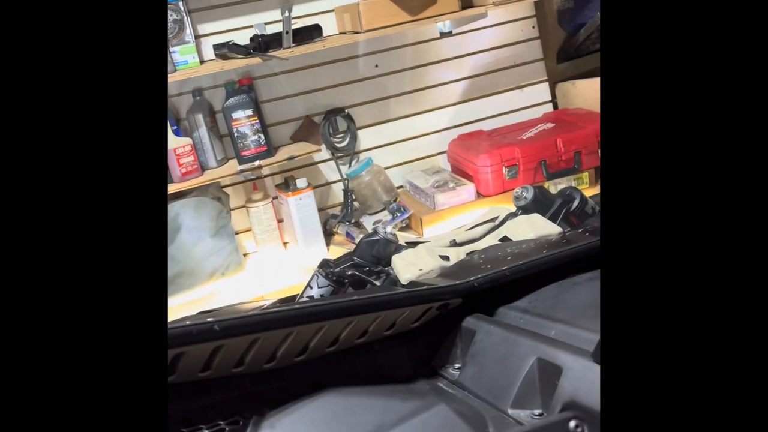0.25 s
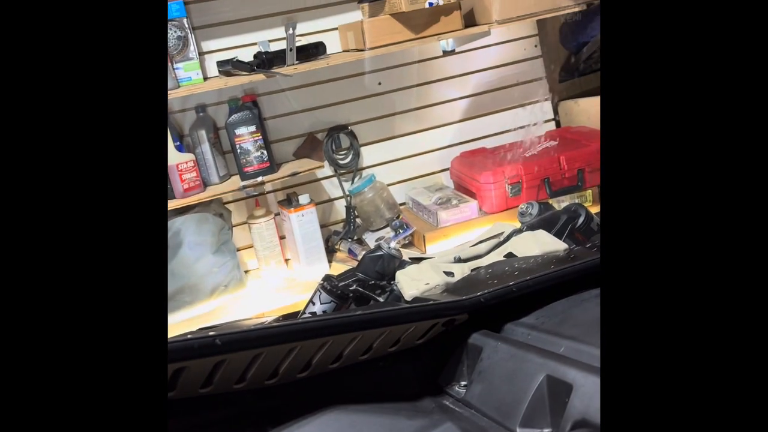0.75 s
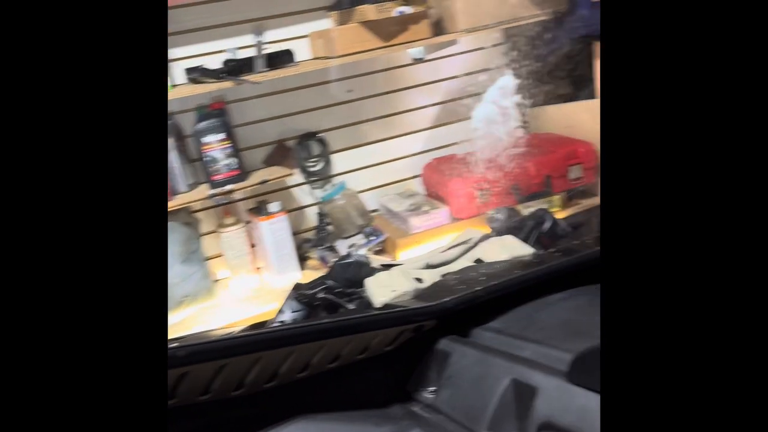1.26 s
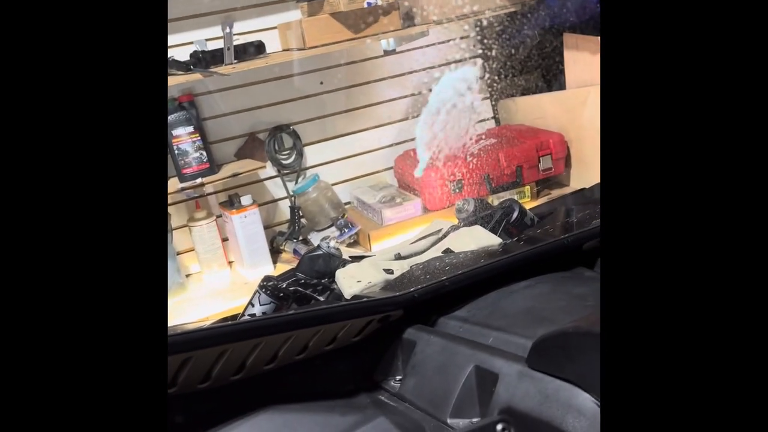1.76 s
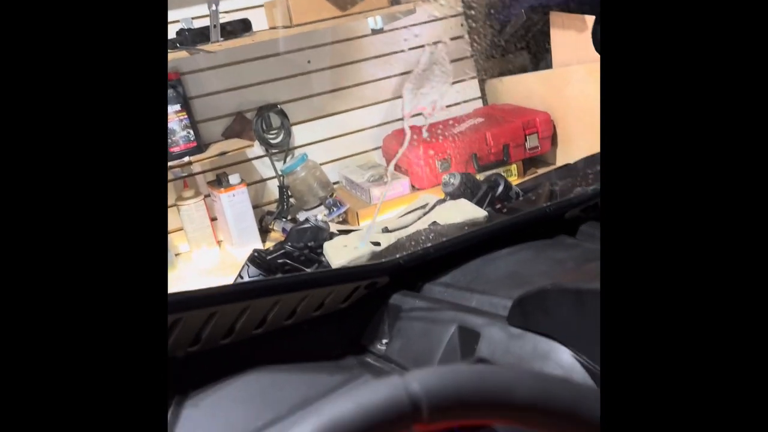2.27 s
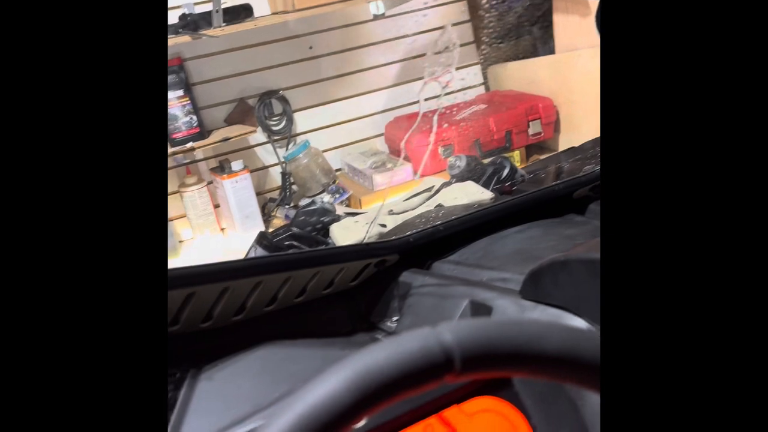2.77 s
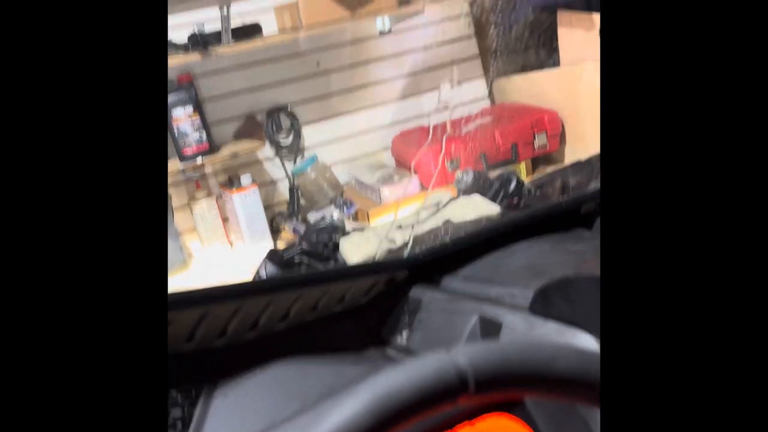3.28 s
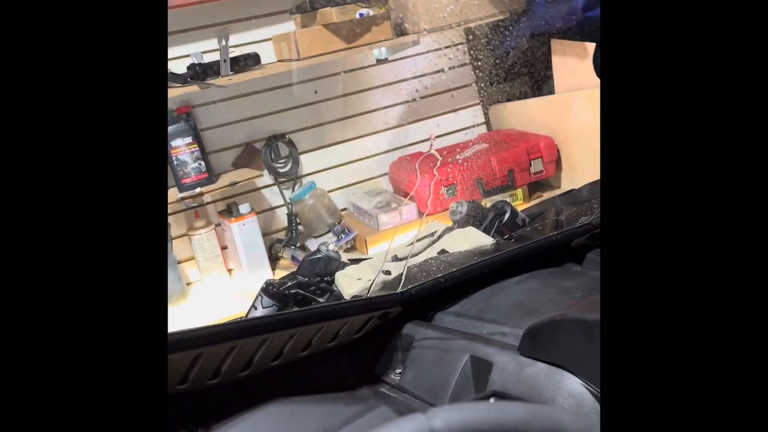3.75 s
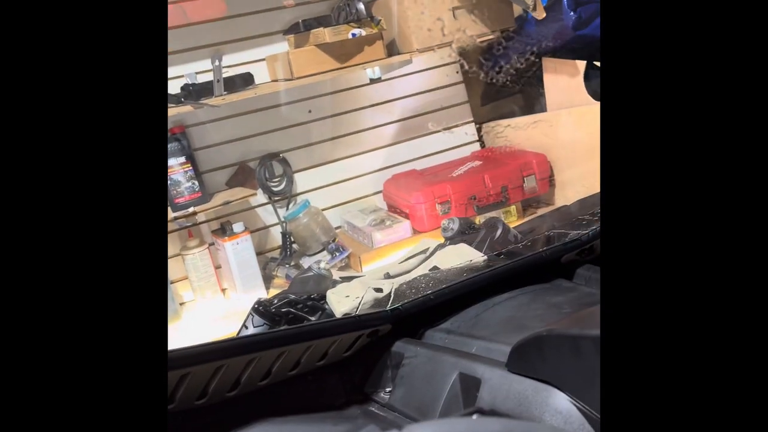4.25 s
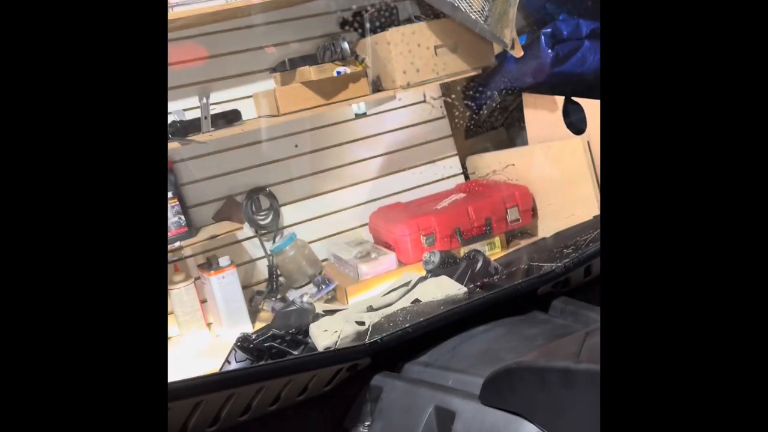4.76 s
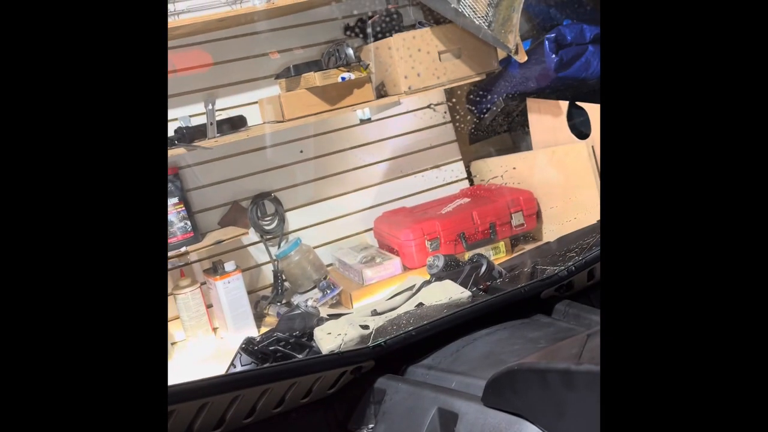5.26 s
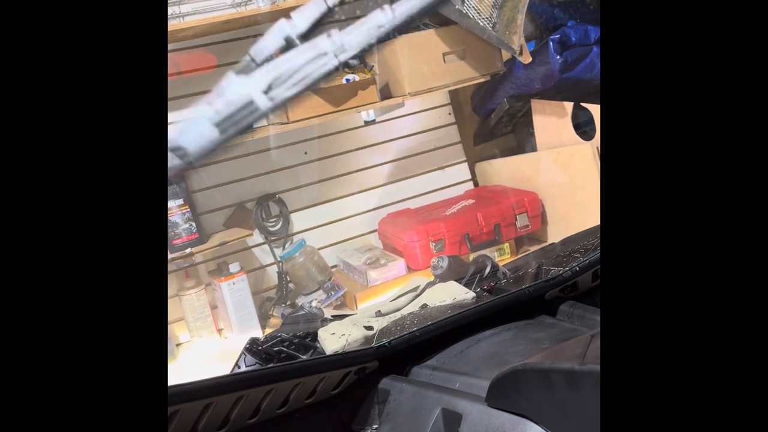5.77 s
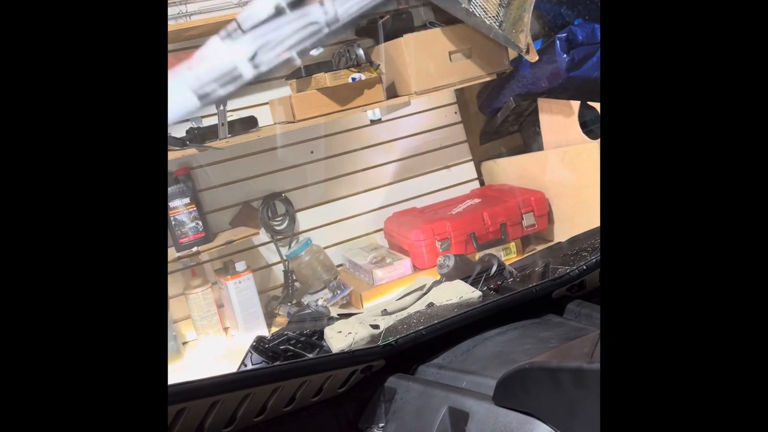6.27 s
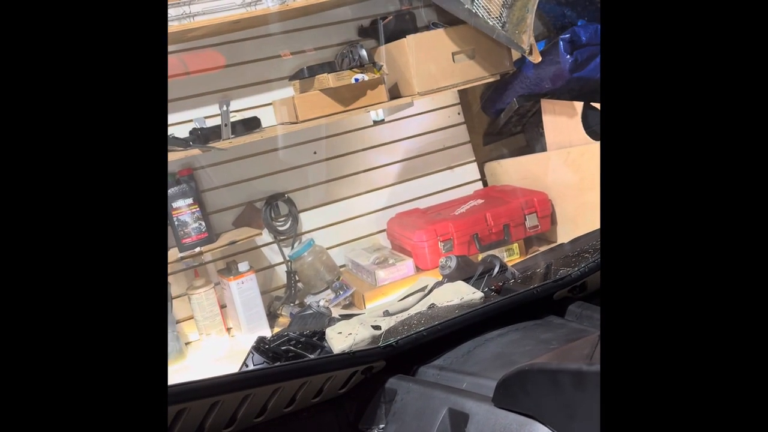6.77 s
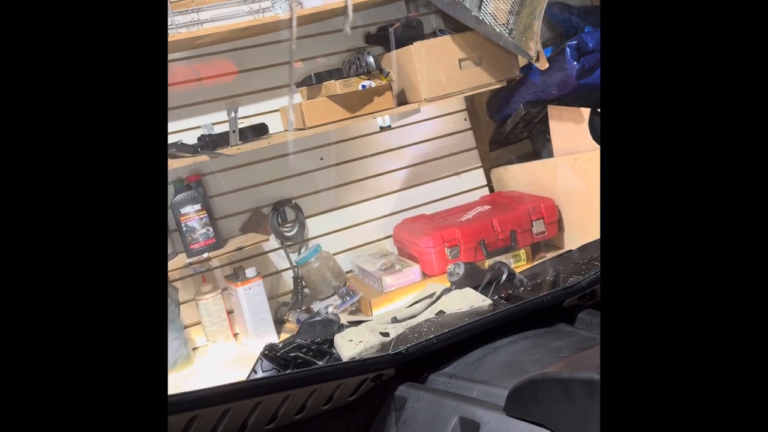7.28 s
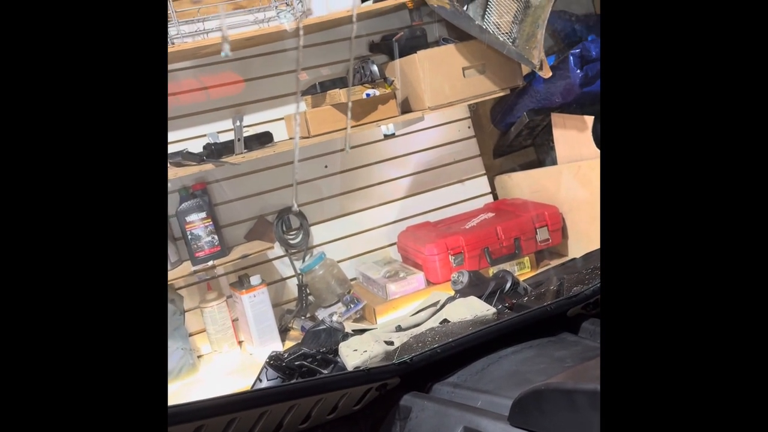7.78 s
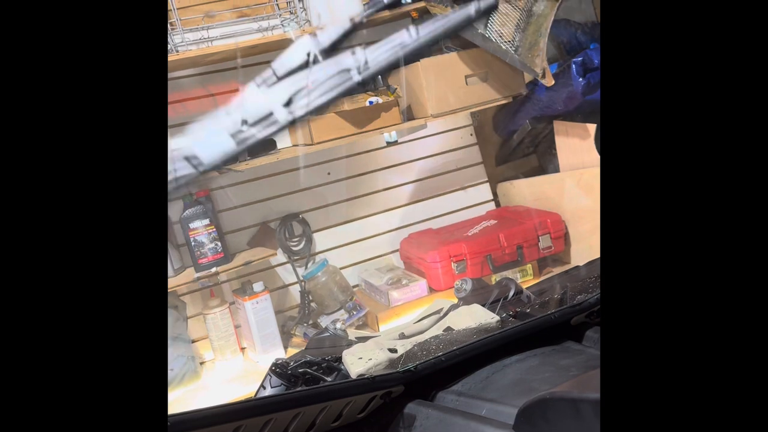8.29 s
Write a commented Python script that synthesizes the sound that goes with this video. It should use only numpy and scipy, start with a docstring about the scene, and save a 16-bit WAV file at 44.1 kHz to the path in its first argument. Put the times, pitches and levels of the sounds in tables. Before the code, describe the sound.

A switch clicks, a small washer pump buzzes and hisses water, then after a pause a wiper motor whines while its blade judders and knocks.

```python
"""Inside a utility vehicle's cab in a garage, a faint rumble and soft bumps are heard, then a switch snaps.
The washer pump hums in harmonics of its speed, and filtered noise sprays the windscreen.
Then the wiper motor whines in orders of its shaft, slowing under load in each sweep;
the rubber blade judders and groans by stick and slip, and the linkage knocks where it turns round."""
import sys
import numpy as np
from scipy import signal
from scipy.fft import rfft, irfft, next_fast_len
from scipy.io import wavfile
from scipy.ndimage import uniform_filter1d, map_coordinates

SR = 44100
rng = np.random.default_rng(int(sys.argv[2]) if len(sys.argv) > 2 else 0)


def master_out(mix):
    """Clip the mix to full scale and print it as 16-bit PCM to the path in sys.argv[1]."""
    frames = np.transpose(np.atleast_2d(mix))
    ceiling = np.clip(frames, -1, 1)
    pcm = np.round(ceiling * 32767).astype(np.int16)
    wavfile.write(sys.argv[1], SR, pcm)


N = 376173  # samples

# Times named _S and t60 are in seconds; an attack is a time constant, a t60 the time to fall 60 dB.

# Load on the motor over one crank turn. Each row: time into the turn in s, armature slots passing per second.
LOAD_CYCLE = [(0, 543), (.2, 531), (.38, 513), (.55, 490), (.66, 468), (.76, 461), (.93, 480), (1.08, 478),
              (1.2, 524), (1.29, 528), (1.43, 516), (1.56, 476), (1.64, 461), (1.78, 451), (1.95, 443),
              (2.12, 459), (2.3, 497), (2.44, 540)]
# Speed gained where the glass is more slippery. Each row: time in s, gain in Hz.
SLIPPERY_GLASS = [(3.6, -1), (5.7, 0), (6.1, 0.5), (6.19, 10), (6.55, 12), (6.7, 0.5), (6.9, -2.5),
                  (7.15, 6.5), (7.5, 9.5), (7.9, 3), (8.15, 5.5), (8.33, 12.5), (8.5, 1.5)]
# Jolts of the arm that brake the motor. Each row: time in s, dip in Hz, delay of the first rebound in s.
ARM_JOLTS = [(3.745, 22, 0.075), (5.04, 48, 0.138), (6.23, 28, .155), (7.52, 48, .136), (8.41, 24, 0.13)]
MOTOR_START_S, RUN_UP_S = 3.585, .013  # start, and time constant of the run-up
TURN_START_S, TURN_S = 3.7, 2.48  # one turn of the crank takes the blade out and back
JOLT_WIDTH_S, REBOUND_SHRINK, REBOUND_KEEPS = .028, .63, .58  # each rebound's delay and depth shrink so
MID_SPEED_HZ = 480  # reference slot rate

# Standing waves of the cab at the slot tone and its octave. Each row: frequency in Hz, level in dB.
SLOT_TONE_RESPONSE = [(442, -50.5), (452, -52.5), (461, -44.5), (472, -42), (484, -40.5), (499, -47),
                      (510, -45.5), (530, -41), (548, -49)]
SLOT_OCTAVE_RESPONSE = [(885, -47), (925, -42.5), (945, -44), (965, -52), (990, -40), (1030, -46),
                        (1055, -40.5), (1095, -51)]
# Housing resonances that the overtones cross. Each row: frequency in Hz, level in dB.
THIRD = [(1330, -48), (1368, -56), (1395, -51.5), (1470, -54), (1570, -58.5)]
FOURTH = [(1780, -76), (1900, -62), (1980, -54.5), (2020, -44), (2060, -50), (2110, -54), (2190, -53)]
FIFTH = [(2225, -50.5), (2275, -58.5), (2315, -48), (2375, -52), (2430, -57), (2475, -49), (2515, -50.5),
         (2580, -63), (2630, -67.5), (2675, -48.5), (2740, -62)]
WORM = [(2500, -70), (2590, -67), (2640, -61.5), (2672, -40.5), (2710, -64), (2760, -75), (3000, -79)]
SEVENTH = [(3110, -78), (3160, -60), (3330, -57.5), (3395, -52.5), (3500, -54.5), (3600, -50.5),
           (3700, -54.5), (3780, -56.5)]
EIGHTH = [(3550, -68), (3750, -67.5), (3830, -61), (4000, -65.5), (4120, -56.5), (4200, -62.5),
          (4280, -58.5)]
# Motor overtones. Each row: order of the shaft, response table, extra dB in the first sweep.
MOTOR_OVERTONES = [(36, THIRD, 0), (48, FOURTH, 0), (60, FIFTH, 5), (66, WORM, 0), (84, SEVENTH, 2),
                   (96, EIGHTH, 10)]
FIRST_SWEEP_S, FIRST_SWEEP_WIDTH_S = 4.06, 0.27
# Faint armature and gear whine. Each row: order of the shaft, level in dB before the housing's gain.
WHINE_ORDERS = [(11, -63), (13, -61), (16, -64), (18, -60), (19, -61), (20, -60), (22, -62), (23, -57.5),
                (25, -57.5), (26, -62), (28, -60), (29, -63), (30, -61), (32, -63), (34, -62), (35, -65),
                (37, -66), (47, -64), (49, -62), (52, -62), (53, -61), (58, -62), (62, -63), (63, -61),
                (64, -61), (65, -58), (72, -67), (74, -68), (75, -68), (95, -66), (100, -67), (102, -69),
                (106, -63), (108, -63), (119, -66), (126, -67), (132, -63), (142, -62), (144, -62),
                (154, -63), (156, -65), (167, -62), (168, -60), (170, -61)]
# Resonances of the motor housing. Each row: centre in Hz, width in Hz, gain in dB.
HOUSING_MODES = [(2950, 50, -4.5), (4000, 82, 11.5), (6400, 160, 7.5), (6850, 120, -4.5)]
# Spectra of the gear and brush scraping. Each row: frequency in Hz, level in dB.
GEAR_COLOUR = [(100, -26.5), (300, 1), (600, -1.5), (800, 2.5), (1120, 1), (1600, -11.5), (1900, -8),
               (2050, 7.5), (2350, -2), (2600, -2), (2900, -6)]
BRUSH_COLOUR = [(1500, -15.5), (2900, -6.5), (3400, -10.5), (4100, -6.5), (4700, -9.5), (5500, -4.5),
                (6100, -1.5), (6700, 2.5), (7500, -2), (8700, -14), (9500, -2), (11400, -56.5),
                (12200, -13), (13400, -18.5), (15500, -13.5)]
TONE_BUILD_S = 0.31  # time constant of the slot tones' build-up
WHINE_DB, WHINE_DB_PER_HZ = -0.5, 0.0051  # whine gain at mid speed, and its growth with slot rate
BRUSH_DB, BRUSH_DB_PER_HZ = -41, 0.0264  # brush hiss at mid speed, and its growth with slot rate

# The gear housing sings late in each sweep. Each row: time in s, level in dB.
SINGING = [(4.7, -47.5), (5.97, -50), (7.2, -49.5), (8.47, -48)]
# Resonance of the singing housing, applied twice. Each row: centre in Hz, width in Hz, gain in dB.
SINGING_MODE = [(2676, 440, 0)]
SING_WIDTH_S, SING_ORDER = 0.31, 64  # bell width; multiple of the shaft's speed
SING_SPREAD_HZ = 170  # width of the grain's resonance before it is cubed

# The linkage takes up its slack. Each row: time in s, level in dB.
CLUNKS = [(5.04, -31.5), (6.174, -45.5), (7.222, -45.5), (7.519, -31.5)]
# Modes of the windscreen and its frame. Each row: frequency in Hz, mean level in dB, t60 in s.
LINKAGE_MODES = [(42.3, -22.5, 0.37), (85, -10.5, 0.43), (180.6, -3.5, 0.19), (216, -4, 0.19),
                 (334, -2, 0.18), (816, -20, 0.04)]

# Judder of the whole blade. Each row: start in s, length in s, glass level in dB, rasp level in dB.
JUDDERS = [(3.682, 0.014, -26, -36.5), (3.698, .055, -22, -33.5), (3.765, 0.045, -26.5, -31.5),
           (3.81, 0.026, -30.5, -38.5), (3.845, 0.058, -36.5, -39.5), (3.915, 0.025, -30, -45),
           (4.005, 0.056, -41.5, -43), (4.095, .035, -36.5, -49), (6.168, 0.041, -27, -36),
           (6.222, 0.023, -29, -41), (6.252, 0.055, -30.5, -34.5), (6.318, 0.017, -42, -41),
           (6.395, .035, -39, -42), (6.598, 0.029, -34.5, -44), (6.64, 0.13, -43.5, -60)]
# Pace of the judder. Each row: time in s, hops per second.
JUDDER_RATE = [(3.69, 88), (3.75, 98.5), (3.8, 84), (3.86, 82), (3.93, 80), (4.1, 89), (6.17, 80),
               (6.23, 83), (6.3, 79), (6.4, 82)]
# Spectra of the shaken glass and the rubber's rasp. Each row: frequency in Hz, level in dB.
GLASS_COLOUR = [(60, -21.5), (90, -11), (125, 5), (160, 2.5), (185, 13), (215, -1.5), (247, 4.5),
                (278, -1.5), (330, 5), (380, -2), (470, -10), (650, -21), (1200, -47)]
RASP_COLOUR = [(250, -20.5), (480, 4.5), (720, 3.5), (900, -1.5), (1070, -1.5), (1300, -10.5), (1900, -9),
               (2600, -18), (4000, -28.5), (8000, -59), (12000, -87)]
# Groans of the lip. Each row: start in s, length in s, tone level in dB, rasp level in dB, roughness from 0 to 1.
GROANS = [(3.845, 0.024, -30.5, -48, .3), (3.9, 0.059, -31.5, -53, 0.21), (4.002, 0.07, -38, -54.5, 0.23),
          (4.1, 0.049, -44, -48, .3), (6.255, 0.048, -30, -39, .35), (6.311, 0.076, -29.5, -43, .2),
          (6.4, 0.022, -23, -34.5, 0.44), (6.443, 0.025, -24.5, -30.5, .2), (6.482, .03, -33, -36, .3),
          (6.516, 0.044, -22.5, -29, 0.09), (6.57, 0.029, -34.5, -35, .3), (6.607, 0.013, -26.5, -42, .2)]
# Pitch of the groaning lip. Each row: time in s, slips per second.
SLIP_RATE = [(3.85, 324), (3.92, 350), (3.96, 325), (4.01, 320), (4.06, 295), (4.14, 314), (6.25, 238),
             (6.31, 272), (6.35, 322), (6.39, 335), (6.415, 382), (6.455, 352), (6.485, 390), (6.52, 358),
             (6.57, 355), (6.595, 307), (6.62, 373)]
# Spectrum of the lip's rasp. Each row: frequency in Hz, level in dB.
LIP_COLOUR = [(350, -12), (520, 0.5), (720, 0.5), (1070, -0.5), (1400, -4.5), (1800, -8), (2150, -10),
              (2600, -12.5), (4000, -24.5), (8000, -54.5)]
JUDDER_JITTER, JUDDER_GRIT = .05, .5  # scatter of the hop rate; scraping noise relative to the hops
GRAB_ATTACK_S, GRAB_T60_S = 0.0048, 0.12

# The blade flops over at the ends of its sweep. Each row: time in s, level in dB.
FLIPS = [(5.034, -33), (6.179, -25), (7.511, -39)]
# Spectrum of the clack. Each row: frequency in Hz, level in dB.
FLIP_COLOUR = [(150, -14.5), (400, 6), (950, 7), (1400, -8.5), (2100, -2), (2700, -16), (3500, -29),
               (8000, -52)]

# Pump speed: it runs up, labours while it swallows air, then settles. Each row: time in s, speed in Hz.
PUMP_SPEED = [(.577, 200), (.6, 245), (.63, 272), (.655, 300), (.715, 307), (.755, 315), (.8, 318.7),
              (.9, 320), (1.1, 321.1), (1.4, 321.9)]
# Pump harmonics, relative to the pump's level. Each row: multiple of the pitch, dB while it draws air,
# dB once primed, drift in dB per second.
PUMP_ORDERS = [(1, -7, -1.5, -7), (2, -14, -4.3, -.5), (3, -22, -21, 3.5), (4, -14, -9.5, -.5),
               (5, -5, -.7, 2), (6, -24, -18.5, 4), (7, -19, -31, 0), (8, -28, -30, 0), (9, -35, -19, -3),
               (10, -35, -24, -3), (11, -32, -33, 14), (12, -31, -32, 8), (13, -26, -33, 3),
               (14, -33, -26, 0), (16, -30, -23, -5), (17, -35, -29, 2), (18, -28, -25, -8),
               (19, -36, -37, 15), (20, -30, -24, -3), (21, -34, -26, -3), (22, -26, -18, -5),
               (23, -19, -17, 7), (25, -28, -21, 5), (28, -26, -17, -12), (29, -21, -12, -1),
               (30, -23, -14, 2)]
# Partials that swell and fade as the pressure builds. Each row: multiple, time in s, width in s, dB.
PUMP_FLARES = [(7, .685, .04, -12), (6, .755, .035, -12), (8, .755, .04, -13), (11, .8, .1, -18),
               (12, .83, .09, -16), (13, .92, .09, -14), (10, .96, .13, -19), (18, 1.1, .18, -17),
               (20, 1.1, .17, -9.5), (29, 1.15, .2, -12), (8, 1.15, .13, -20), (8, 1.47, .28, -15.5)]
# Resonances of the pump body, applied twice. Each row: centre in Hz, width in Hz, gain in dB.
PUMP_BODY = [(1230, 87, -3), (1550, 95, -12), (1900, 100, 2), (2170, 90, 0), (2510, 84, 0), (3550, 130, -4),
             (3850, 146, -7)]
# Water hissing as it surges, flows and drains. Each row: start in s, length in s, level in dB, t60 in s.
SPRAY = [(.58, 0.033, -47, 0.65), (0.62, 1.04, -51, 0.24), (1.675, 0.13, -50, 0.24)]
# Spectrum of the spray. Each row: frequency in Hz, level in dB.
SPRAY_COLOUR = [(60, -4), (200, -2.5), (700, -2), (1400, -0.5), (2700, -1), (4200, -3), (4800, -9),
                (7000, -2), (8000, -3.5), (15500, -23)]
# Spectra of the pump's vanes and of the spitting nozzle. Each row: frequency in Hz, level in dB.
VANE_COLOUR = [(1000, -33.5), (9000, -5), (11500, -31.5), (13500, 4), (15500, -1.5)]
SPIT_COLOUR = [(3000, -10.5), (6000, -3.5), (8500, -1.5), (12000, -15.0)]
PUMP_ON_S, PUMP_OFF_S = .577, 1.668  # the switch is pressed and let go
PUMP_DB = -42.5  # at full speed
FIRST_BITE_S = 0.648  # the vanes bite and the overtones set in
PRIME_S, PRIME_TAKES_S, AIR_FLUTTER_DB = 0.744, 0.081, 3  # water arrives; before that the hum flutters
PRIMED_S = .85  # the drift counts from here
COAST_S, COAST_DB_PER_S = .3, 58  # rotor's slowing; each order loses this many dB more per second
RATTLE_DB, RATTLE_HOLD_S, RATTLE_T60_S = -50, 0.073, 0.28  # the body rattles while it fills
SPIT_S, SPIT_LENGTH_S, SPIT_DB = 1.975, 0.043, -51.5  # the nozzle spits as the hose empties

# Snaps of switches, relay and wiper arm. Each row: time in s, crack in dB, crack t60 in s, knock in dB, ping in dB.
SNAPS = [(0.579, -30, 0.074, -54.5, -31), (1.670, -25, 0.038, -55, -30), (1.673, -35, 0.14, -41, -44),
         (2.786, -55, 0.83, -78, -55), (3.565, -64, 0.095, -51, -51.5), (3.582, -20, 0.034, -40, -47),
         (3.584, -15, 0.011, -25, -55.5), (3.592, -42, 0.08, -36, -49), (8.364, -12.5, 0.029, -25, -22),
         (8.37, -28.5, 0.061, -36, -42)]
# Spectra of the crack and of the knock. Each row: frequency in Hz, level in dB.
CRACK_COLOUR = [(300, -30), (1000, -16.5), (1900, 1), (2600, -15), (3500, 1.5), (5300, 0), (6000, 5),
                (8000, 3.5), (9800, 7.5), (11500, -12), (14500, -6.5), (15500, -3)]
KNOCK_COLOUR = [(60, -11), (180, 5), (350, 5), (700, 0.5), (1300, 0), (2000, -17), (5000, -6.5),
                (11000, -75)]
# Spectrum of the metal ping. Each row: frequency in Hz, level in dB.
PING_COLOUR = [(2000, -56.0), (2550, 2.0), (2750, -4.5), (3100, -8.5), (4500, -27.5)]

# Bumps of cab and linkage. Each row: time in s, thud in dB, knock in dB, t60 of both in s, panel sway in dB.
BUMPS = [(0.014, -63.5, -65, 1, -53), (0.391, -49.5, -66, 0.32, -71), (.525, -46.5, -68, 0.2, -63),
         (.59, -43.5, -47, 0.34, -63.5), (1.703, -47.5, -45, 0.71, -70), (2.095, -36.5, -80, 0.2, -48.5),
         (2.17, -61, -92, 0.2, -51), (2.786, -36, -51.5, 0.3, -46.5), (2.91, -68, -61.5, 0.32, -62),
         (4.65, -48, -55, 0.23, -44.5), (4.951, -42.5, -50, 0.25, -43), (5.037, -28.5, -37.5, 0.13, -38),
         (5.114, -40.5, -47, 0.16, -53), (6.177, -20, -47, 0.13, -59), (6.6, -35, -57, 0.36, -63),
         (7.11, -48.5, -43.5, 0.31, -41), (7.219, -47, -38, 0.12, -55), (7.4, -45, -49, 0.41, -43.5),
         (7.519, -33.5, -39.5, 0.23, -47.5), (8.45, -37.5, -62, 0.23, -47)]
# Spectra of the thud and of the panel sway. Each row: frequency in Hz, level in dB.
THUD_COLOUR = [(25, -29), (55, -3.5), (85, 7.5), (125, -7), (190, 1), (300, -19.5), (600, -43), (3000, -94)]
SWAY_COLOUR = [(15, -37), (30, -25.5), (43, -4.5), (62, 0), (100, -27.5), (300, -52.5)]
SWAY_ATTACK_S, SWAY_T60_S = 0.028, 0.73  # the panels swing on after each bump

WHISTLE_S, WHISTLE_RISE_S, WHISTLE_DB = 2.43, 0.42, -69.5

# Spectra of the cab's drone and of the garage hiss. Each row: frequency in Hz, level in dB.
DRONE_COLOUR = [(35, -34), (70, -5), (94, 6.5), (120, -12), (180, -9), (280, -15), (500, -26),
                (1500, -46.5)]
GARAGE_COLOUR = [(60, -9), (300, -2.5), (550, -5.5), (1500, -3), (2300, 9), (3400, -4), (5000, 3),
                 (5700, 0), (7300, -0.5), (8600, -7.5), (12000, -18.5), (14000, -12.5), (15000, 16),
                 (15700, 1)]
# Faint thin tones of steady pitch. Each row: frequency in Hz, level in dB.
THIN_TONES = [(2000, -78), (6000, -77.5), (10000, -73.5)]
REST_SWAY_DB, REST_DRONE_DB = -74, -59  # the cab at rest
RUN_SWAY_DB, RUN_DRONE_DB, SHAKE_DB_PER_HZ = -58.5, -51, 0.0865  # motor's share at mid speed; growth with speed

# Sideways reflections in the cab. Each row: frequency in Hz, share of the power scattered.
SCATTERED_SHARE = [(80, .001), (140, .005), (300, .02), (550, .18), (1000, .11), (1700, .13), (2400, .3),
                   (3000, .33), (5000, .33), (5900, .11), (8500, .11), (10500, .003), (13200, .003),
                   (15500, .2)]
# Standing waves that favour one side. Each row: frequency in Hz, left minus right in dB.
STANDING_BALANCE = [(320, -3.7), (440, -2), (456, -4), (480, 0), (500, -1), (540, 5), (640, -1.5),
                    (885, 10), (905, 10), (925, 2), (965, -2.5), (1005, 2), (1060, -3), (1090, -7),
                    (1285, -1), (1610, 1), (2500, 0)]
# Level difference of the microphone ports. Each row: frequency in Hz, left minus right in dB.
PORT_BALANCE = [(100, 0), (330, .7), (550, 3), (950, 2.5), (1600, .5), (2500, 0), (4000, .5), (7000, 0)]
# Phase difference of the microphone ports. Each row: frequency in Hz, radians by which the left leads.
PORT_PHASE = [(250, 0), (550, .55), (1000, .3), (1450, -.35), (2000, 0), (5000, -.2), (6500, -1),
              (8000, -1.7), (10500, -3.1), (13200, -3.2), (15500, -4.3)]
TOP_HZ = 15800  # band limit


def amp(db):
    """Level: decibels to amplitude gain."""
    return 10 ** (np.asarray(db) / 20)


def unit(x):
    """Normalisation to rms 1."""
    return x / np.sqrt(np.mean(x ** 2) + 1e-20)


def levelled(x, size=1500):
    """Normalisation to a running rms of 1, over size samples."""
    return x / np.sqrt(np.abs(uniform_filter1d(x * x, size)) + 1e-9)


def along(points, hz):
    """Interpolation of (Hz, value) points on a logarithmic frequency axis."""
    f, v = np.transpose(points)
    return np.interp(np.log(hz + 1), np.log(f + 1), v)


def curves(rows):
    """Interpolation in time: one value per sample for each column after the time."""
    s, *columns = np.transpose(rows)
    return [np.interp(np.arange(N) / SR, s, column) for column in columns]


def wobble(rate):
    """Random modulation: a smooth curve through rate random knots per second."""
    knots = rng.standard_normal(int(N * rate / SR) + 4)
    fine = np.arange(0, N * rate / SR + 1, 1 / 8)  # spline read at eighths of a knot
    return np.interp(np.arange(N) * (rate / SR), fine, map_coordinates(knots, [fine]))


def since(s):
    """Seconds gone by since time s, zero before it."""
    return np.maximum(np.arange(N) / SR - s, 0)


def held(s, length, attack, t60):
    """Exponential attack at time s, hold, and exponential release after length."""
    release_db = -60 * np.minimum(since(s + length) / t60, 2)
    return (1 - np.exp(-since(s) / attack)) * amp(release_db)


def burst(s, t60, attack):
    """Exponential decay of a blow at time s."""
    return held(s, 0, attack, t60)


def swell(s, width):
    """Gaussian rise and fall around time s."""
    return np.exp(-np.minimum(((np.arange(N) / SR - s) / width) ** 2, 20))


def filtered(x, response):
    """Linear filtering: x times a complex response of frequency."""
    m = next_fast_len(N + SR // 2)
    return irfft(rfft(x, m) * response(np.fft.rfftfreq(m, 1 / SR)), m)[..., :N]


def coloured(x, spectrum):
    """Spectral shaping by (Hz, dB) points, at rms 1."""
    return unit(filtered(x, lambda hz: amp(along(spectrum, hz))))


def noise(spectrum):
    """Coloured Gaussian noise of rms 1."""
    return coloured(rng.standard_normal(N), spectrum)


def resonance(modes, hz):
    """Resonance: gain at hz of (Hz, width, dB) modes whose powers add."""
    power = sum(amp(db) ** 2 / (1 + (2 * (hz - centre) / width) ** 2) for centre, width, db in modes)
    return np.sqrt(power)


def partial(turns, order):
    """Harmonic of rotation: a sine of rms 1 at a multiple of a shaft's speed."""
    return np.sqrt(2) * np.sin(2 * np.pi * (order * turns + rng.random()))


def rotor(turns, count):
    """Periodicity: a random scraping pattern with count orders that repeats with every turn."""
    spectrum = np.r_[0, np.exp(2j * np.pi * rng.random(count))]
    pattern = irfft(spectrum, 16 * count)
    return unit(np.interp(turns % 1, np.arange(len(pattern)) / len(pattern), pattern))


def motor_speed():
    """Load and speed: the slot rate repeats with every crank turn, and jolts of the arm brake it briefly."""
    turn_time = (np.arange(N) / SR - TURN_START_S) % TURN_S
    hz = np.interp(turn_time, *np.transpose(LOAD_CYCLE)) + curves(SLIPPERY_GLASS)[0]
    for s, dip_hz, rebound in ARM_JOLTS:
        for k in range(3):
            delay = rebound * sum(REBOUND_SHRINK ** j for j in range(k))
            hz = hz - dip_hz * REBOUND_KEEPS ** k * swell(s + delay, JOLT_WIDTH_S)
    return hz * (1 - .5 * np.exp(-since(MOTOR_START_S) / RUN_UP_S))


def wiper_motor(slot_hz):
    """Rotating machinery: twelve slots hum in shaft orders; gear and brushes scrape alike on every turn."""
    slots = np.cumsum(slot_hz * (1 + 0.001998 * wobble(25))) / SR
    turns = slots / 12
    over_mid_hz = slot_hz - MID_SPEED_HZ

    def chatter():
        return unit(amp(2 * wobble(16)) * (1 + .4 * wobble(130)))

    def scrape(hiss):
        return rotor(turns, count=360) + hiss * rng.standard_normal(N)

    hum = 0
    for k, colour in enumerate([SLOT_TONE_RESPONSE, SLOT_OCTAVE_RESPONSE], 1):
        hum = hum + amp(along(colour, k * slot_hz) + 1.03 * wobble(16)) * partial(slots, order=k)

    first = swell(FIRST_SWEEP_S, FIRST_SWEEP_WIDTH_S)
    overtones = 0
    for k, colour, first_db in MOTOR_OVERTONES:
        size = amp(along(colour, k * slot_hz / 12) + first_db * first)
        overtones = overtones + size * chatter() * partial(turns, order=k)

    whine = sum(amp(db) * partial(turns, order=k) for k, db in WHINE_ORDERS) * chatter()
    whine = filtered(whine, lambda hz: np.hypot(.8, resonance(HOUSING_MODES, hz)))
    whine = amp(WHINE_DB + WHINE_DB_PER_HZ * over_mid_hz) * whine

    low_scrape = filtered(scrape(hiss=1.03), lambda hz: hz < 3000)
    gear = amp(-52.5) * coloured(low_scrape, GEAR_COLOUR)

    # each commutator bar sparks as it leaves the brush
    sparks = unit(1 + 0.3 * np.cos(2 * np.pi * slots)) * amp(0.99 * wobble(80))
    brushes = coloured(sparks * scrape(hiss=0.81), BRUSH_COLOUR)
    brushes = amp(BRUSH_DB + BRUSH_DB_PER_HZ * over_mid_hz) * brushes

    build_up = 1 - np.exp(-since(MOTOR_START_S) / TONE_BUILD_S)
    running = np.clip(since(MOTOR_START_S) / 0.043, 0, 1)
    return build_up * hum, running * (overtones + whine + gear + brushes)


def housing(slot_hz):
    """Forced resonance: the worm's teeth drive a narrow, grainy band that glides through a housing mode."""
    def narrow(hz):
        return resonance([(0.0087, SING_SPREAD_HZ, 0)], hz) ** 3

    grain = filtered(rng.standard_normal((2, N)), narrow)
    phase = 2 * np.pi * SING_ORDER * np.cumsum(slot_hz / 12) / SR
    band = grain[0] * np.cos(phase) + grain[1] * np.sin(phase)
    teeth = filtered(band, lambda hz: resonance(SINGING_MODE, hz) ** 2)
    return sum(amp(db) * swell(s, SING_WIDTH_S) for s, db in SINGING) * unit(teeth)


def blade():
    """Stick-slip friction: the whole blade hops slowly and shakes the windscreen; its lip groans faster."""
    def strokes(rows, body, rasp):
        total = 0
        for s, length, body_db, rasp_db, *_ in rows:
            grab = held(s, length, GRAB_ATTACK_S, GRAB_T60_S)
            total = total + grab * (amp(body_db) * body + amp(rasp_db) * rasp)
        return total

    def grit(cycles):
        return rng.standard_normal(N) * (1 + 0.4 * np.cos(2 * np.pi * cycles))

    hops = np.cumsum(curves(JUDDER_RATE)[0] * (1 + JUDDER_JITTER * wobble(70))) / SR
    shake = rotor(hops, count=48) * amp(2.6 * wobble(60)) + JUDDER_GRIT * grit(hops)
    glass = levelled(coloured(shake, GLASS_COLOUR), size=1000)
    judder = strokes(JUDDERS, glass, levelled(coloured(shake, RASP_COLOUR)))

    roughness = curves([(s + length / 2, r) for s, length, _, _, r in GROANS])[0]
    rough = np.clip(roughness, 0, 1)
    cycles = np.cumsum(curves(SLIP_RATE)[0] * (1 + .14 * rough * wobble(160))) / SR
    slips = unit(sum(partial(cycles, order=k) for k in range(1, 13)))
    smooth_rasp = (1 - rough) * coloured(slips, LIP_COLOUR)
    rough_rasp = (rough + .15) * coloured(grit(cycles), LIP_COLOUR)
    groan = strokes(GROANS, partial(cycles, order=1), levelled(smooth_rasp + rough_rasp))
    return judder + groan


def linkage():
    """Modal ringing: each clunk excites decaying sines of the windscreen and its frame."""
    t, out = np.arange(SR) / SR, np.zeros(N + SR)
    for s, db in CLUNKS:
        ring = 0
        for hz, level_db, t60 in LINKAGE_MODES:
            decay = amp(level_db + rng.normal(0, 1.7) - 60 * t / t60)
            ring = ring + decay * np.sin(2 * np.pi * hz * t)
        out[round(s * SR):][:SR] += amp(db) * (1 - np.exp(-t / 0.0041)) * ring
    return out[:N]


def flips():
    """Impact noise: the blade flops over with a short clack where the arm turns round."""
    clack = sum(amp(db) * burst(s, t60=0.063, attack=0.0008) for s, db in FLIPS)
    return clack * levelled(noise(FLIP_COLOUR), size=300)


def pump():
    """Harmonics of rotation: the rotor hums, fluttering until primed; water adds turbulent noise."""
    t, off = np.arange(N) / SR, since(PUMP_OFF_S)
    hz = curves(PUMP_SPEED)[0] * np.exp(-off / COAST_S)
    primed = np.clip((t - PRIME_S) / PRIME_TAKES_S, 0, 1)
    unsteadiness = (0.00048 + .004 * (1 - primed)) * wobble(60)
    turns = np.cumsum(hz * (1 + unsteadiness)) / SR
    gain = amp(PUMP_DB) * held(PUMP_ON_S, PUMP_OFF_S - PUMP_ON_S, attack=.01, t60=0.22)
    bite = np.clip((t - FIRST_BITE_S) / 0.024 + .5, 0, 1)
    flutter_db, waver_db = AIR_FLUTTER_DB * (1 - primed), 0.086 * primed

    hum = 0
    for k, air_db, wet_db, drift in PUMP_ORDERS:
        db = air_db + primed * (wet_db - air_db) + drift * (since(PRIMED_S) - off)
        db = db - k * COAST_DB_PER_S * np.minimum(off, .5)
        db = db + flutter_db * wobble(69.8) + k * waver_db * wobble(6.5)
        flare = sum(amp(peak_db) * swell(s, width) for order, s, width, peak_db in PUMP_FLARES if order == k)
        hum = hum + (amp(db) + flare) * (bite if k > 1 else 1) * partial(turns, order=k)

    buzz = gain * amp(-18) * primed * coloured(rotor(turns, count=49), VANE_COLOUR)
    body = unit(filtered(rng.standard_normal(N), lambda f: resonance(PUMP_BODY, f) ** 2))
    rattle = amp(RATTLE_DB) * held(PUMP_ON_S, RATTLE_HOLD_S, attack=0.097, t60=RATTLE_T60_S) * body
    spit = amp(SPIT_DB) * held(SPIT_S, SPIT_LENGTH_S, attack=0.014, t60=0.19) * noise(SPIT_COLOUR)
    flow = sum(amp(db) * held(s, length, attack=0.014, t60=t60) for s, length, db, t60 in SPRAY)
    return gain * hum, spit + buzz + rattle + flow * noise(SPRAY_COLOUR)


def snaps():
    """Impulsive excitation: contacts snap over and bounce as a crack, a metal ping and a knock in the dash."""
    crack = knock = ping = 0
    for s, crack_db, t60, knock_db, ping_db in SNAPS:
        tail = amp(-14.5) * burst(s, 0.13, attack=0.0056)
        crack = crack + amp(crack_db) * (burst(s, t60, attack=0.0001) + tail)
        knock = knock + amp(knock_db) * burst(s, 0.14, attack=0.003)
        ping = ping + amp(ping_db) * burst(s, 0.076, attack=0.00017)
    # the pressed dash panel rings
    dash = amp(-36.0) * burst(SNAPS[0][0], 0.3, attack=0.017) * np.sin(2 * np.pi * 268 * np.arange(N) / SR)
    return dash + crack * noise(CRACK_COLOUR) + knock * noise(KNOCK_COLOUR) + ping * noise(PING_COLOUR)


def bumps():
    """Damped panel vibration: soft blows on the cab panels, which sway on afterwards."""
    thud = knock = sway = 0
    for s, thud_db, knock_db, t60, sway_db in BUMPS:
        thud = thud + amp(thud_db) * burst(s, t60, attack=0.0068)
        knock = knock + amp(knock_db) * burst(s, t60, attack=0.0021)
        sway = sway + amp(sway_db) * burst(s, SWAY_T60_S, SWAY_ATTACK_S)
    swaying = sway * levelled(noise(SWAY_COLOUR), size=6000)
    return thud * levelled(noise(THUD_COLOUR)) + knock * noise(KNOCK_COLOUR) + swaying


def whistle():
    """Pure tone: a thin electrical whistle at 4 kHz that comes up before the wiper starts."""
    rise = 1 - np.exp(-since(WHISTLE_S) / WHISTLE_RISE_S)
    return amp(WHISTLE_DB) * rise * np.sin(2 * np.pi * 4000 * np.arange(N) / SR)


def background(slot_hz):
    """Addition of powers: the cab's rumble grows with motor speed, over a faint garage hiss and thin tones."""
    shake = (since(MOTOR_START_S) > 0) * amp(SHAKE_DB_PER_HZ * (slot_hz - MID_SPEED_HZ))

    def rumble(colour, rest_db, run_db):
        return np.hypot(amp(rest_db), amp(run_db) * shake) * levelled(noise(colour), size=6000)

    sway = rumble(SWAY_COLOUR, REST_SWAY_DB, RUN_SWAY_DB)
    drone = rumble(DRONE_COLOUR, REST_DRONE_DB, RUN_DRONE_DB)
    t = np.arange(N) / SR
    tones = sum(amp(db + 1.4 * wobble(1.8)) * np.sin(2 * np.pi * hz * t) for hz, db in THIN_TONES)
    return sway + drone + amp(-60.5) * noise(GARAGE_COLOUR) + tones


def standing_waves(x):
    """Standing waves: a pure tone is louder on the left or on the right, depending on its pitch."""
    def sides(hz):
        pair = amp(np.array([[.5], [-.5]]) * along(STANDING_BALANCE, hz))
        return pair / np.sqrt(np.mean(pair ** 2, axis=0))
    return filtered(x, sides)


def in_cab(x, size=8192):
    """Diffuse reflection: direct sound plus dense sideways echoes in opposite phase at the two sides."""
    walls = rng.standard_normal(size) * amp(-60 * np.arange(size) / SR / .11)  # t60 0.11 s
    scattered = signal.fftconvolve(x, walls / np.linalg.norm(walls))[:N]

    def share(hz):
        return np.clip(along(SCATTERED_SHARE, hz), 0, 1)

    direct = filtered(x, lambda hz: np.sqrt(1 - share(hz)))
    side = filtered(scattered, lambda hz: np.sqrt(share(hz)))
    return np.array([direct + side, direct - side])


def scene():
    """Superposition of all sources, heard from the driver's seat."""
    slot_hz = motor_speed()
    motor_hum, whine = wiper_motor(slot_hz)
    pump_hum, water = pump()
    wiper = whine + housing(slot_hz) + blade() + linkage() + flips()
    rest = wiper + water + snaps() + bumps() + whistle() + background(slot_hz)
    return standing_waves(motor_hum + pump_hum) + in_cab(rest)


def record(dry):
    """Stereo differences: two microphone ports differ in level and phase, below a sharp band limit."""
    side = np.array([[.5], [-.5]])

    def ports(hz):
        level = amp(side * along(PORT_BALANCE, hz))
        return level * np.exp(1j * side * along(PORT_PHASE, hz)) * (hz < TOP_HZ)
    return filtered(dry, ports)


dry = scene()
out = record(dry)
master_out(out)
```